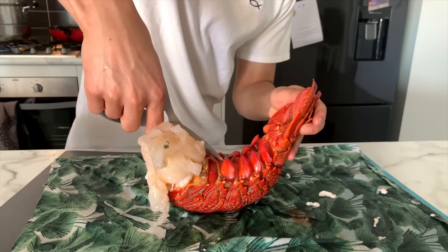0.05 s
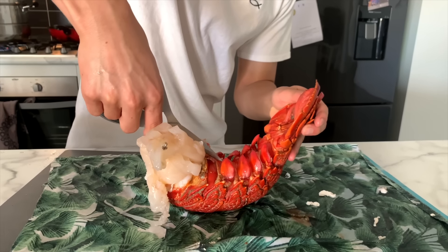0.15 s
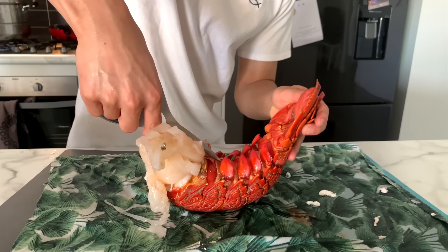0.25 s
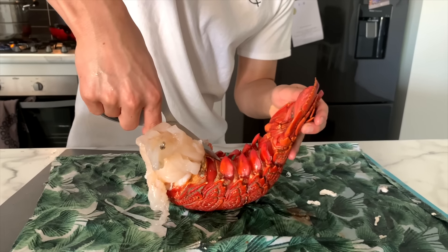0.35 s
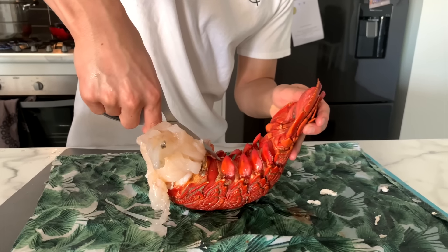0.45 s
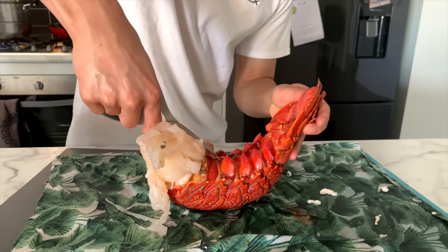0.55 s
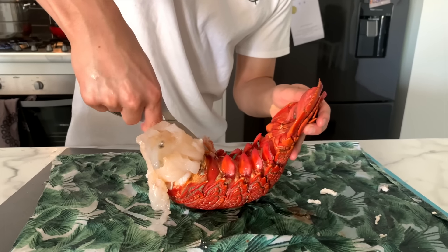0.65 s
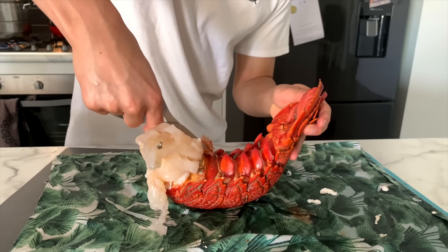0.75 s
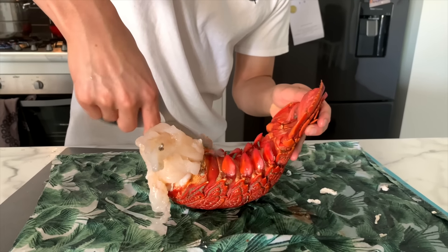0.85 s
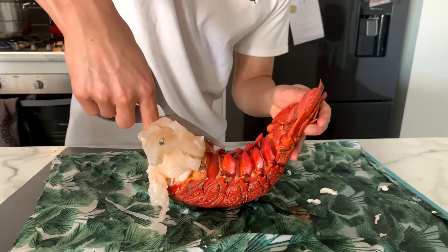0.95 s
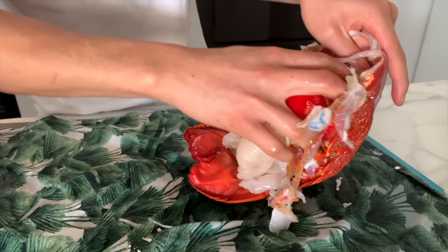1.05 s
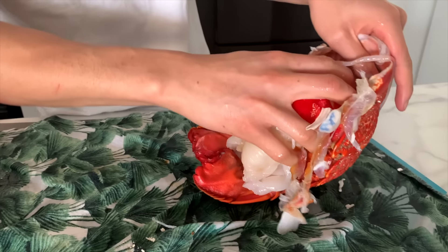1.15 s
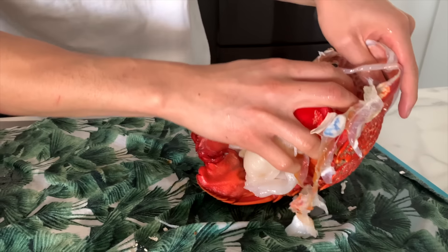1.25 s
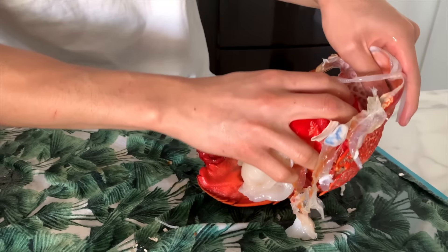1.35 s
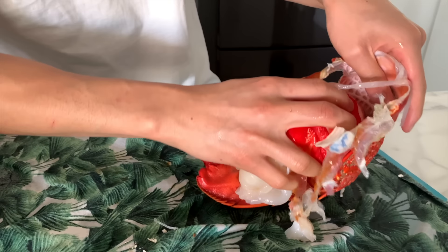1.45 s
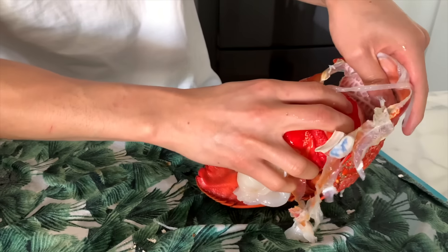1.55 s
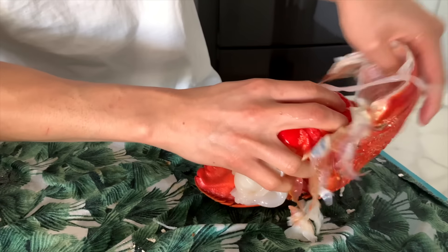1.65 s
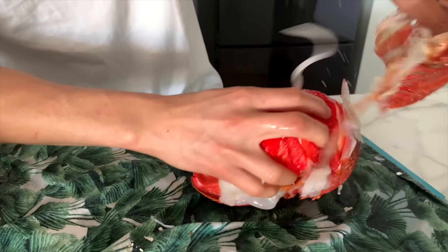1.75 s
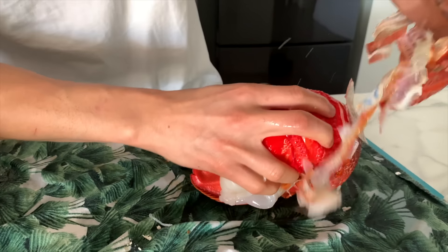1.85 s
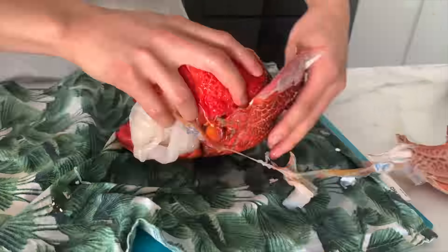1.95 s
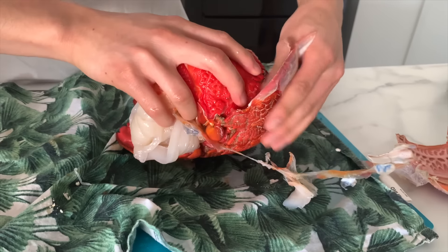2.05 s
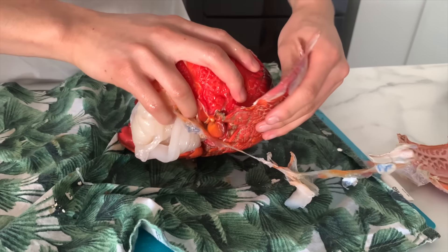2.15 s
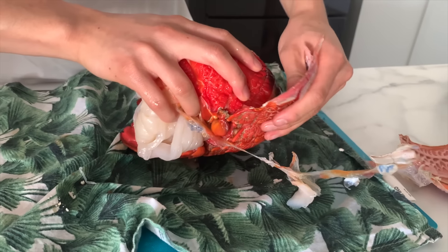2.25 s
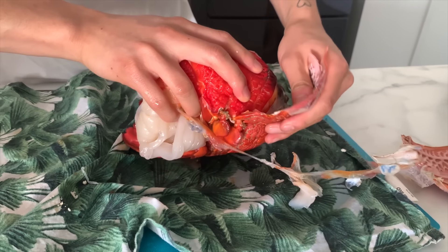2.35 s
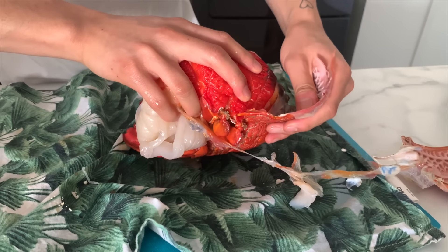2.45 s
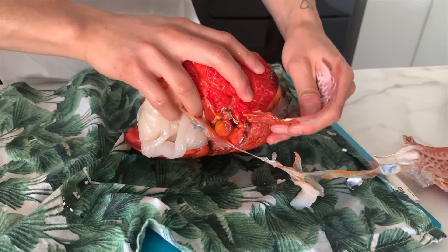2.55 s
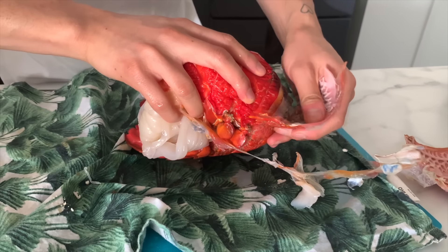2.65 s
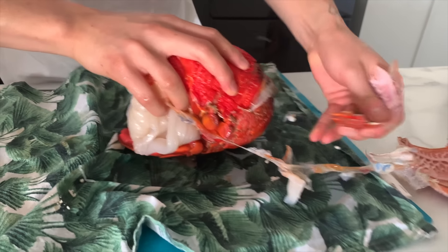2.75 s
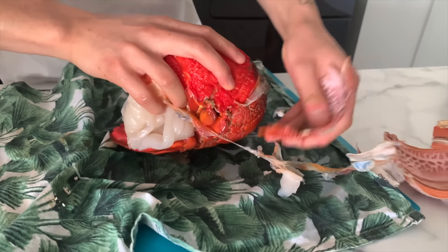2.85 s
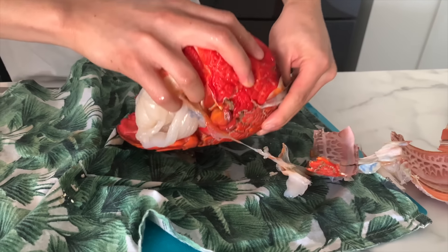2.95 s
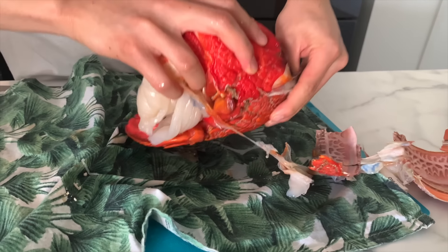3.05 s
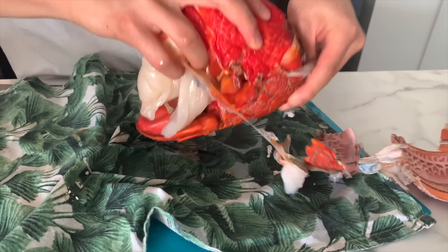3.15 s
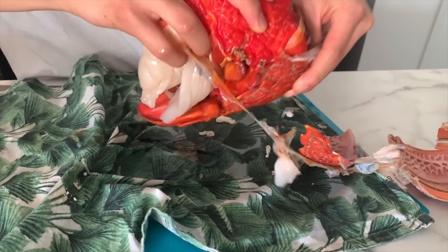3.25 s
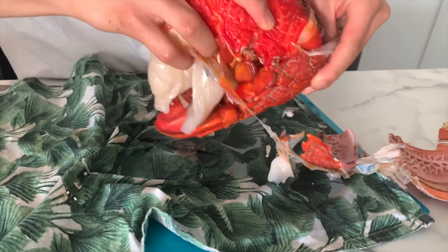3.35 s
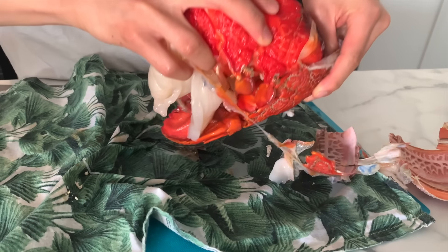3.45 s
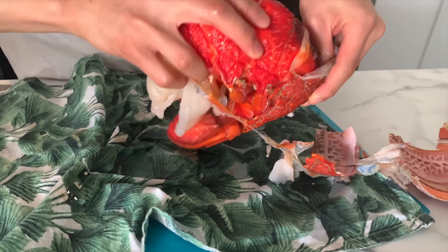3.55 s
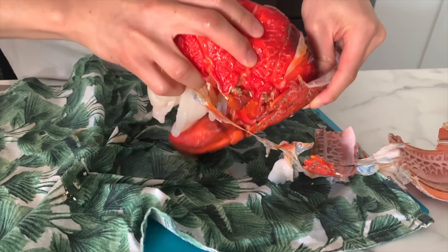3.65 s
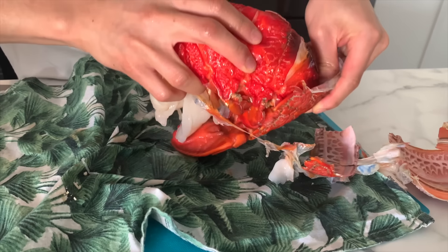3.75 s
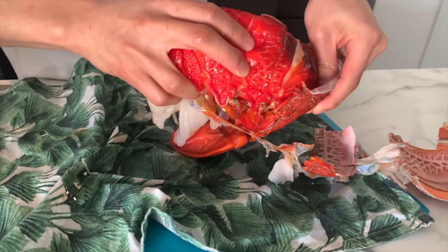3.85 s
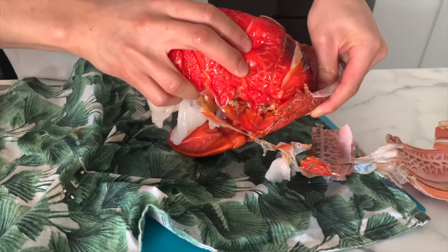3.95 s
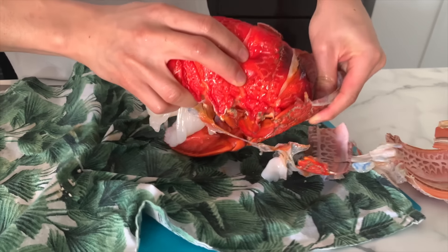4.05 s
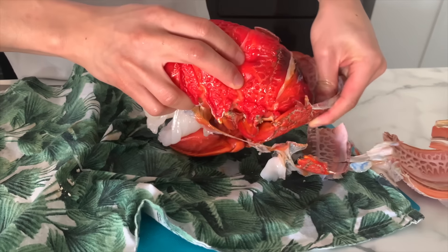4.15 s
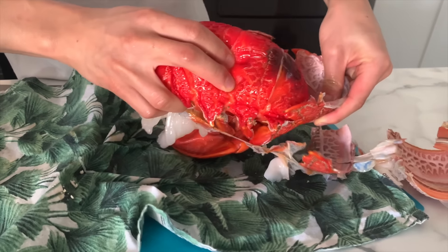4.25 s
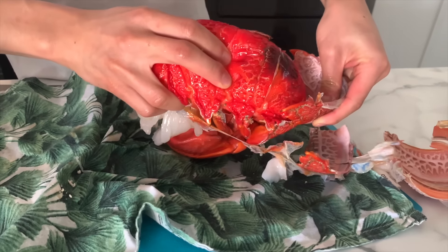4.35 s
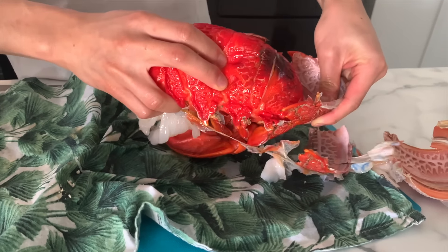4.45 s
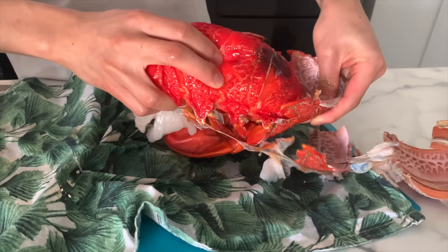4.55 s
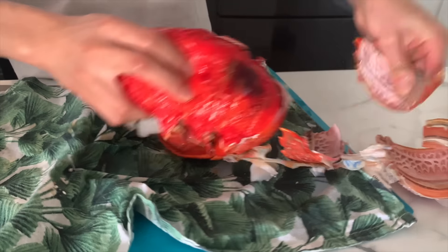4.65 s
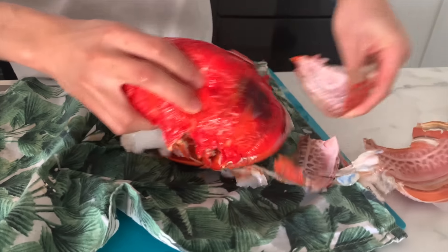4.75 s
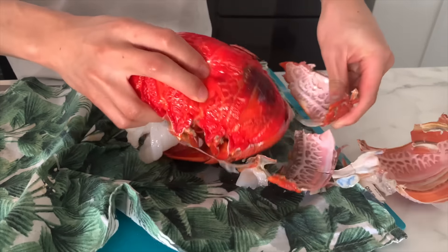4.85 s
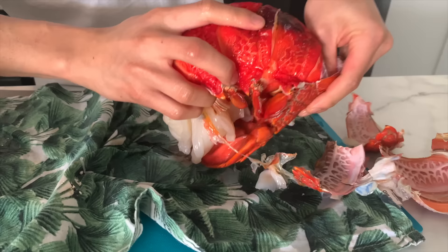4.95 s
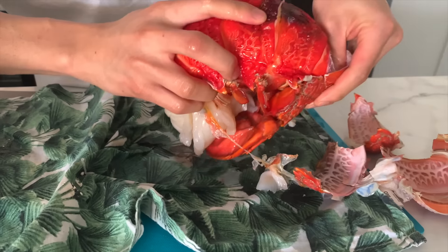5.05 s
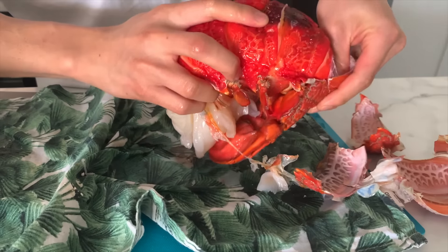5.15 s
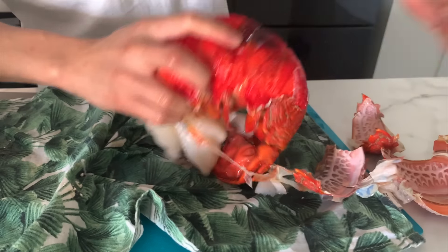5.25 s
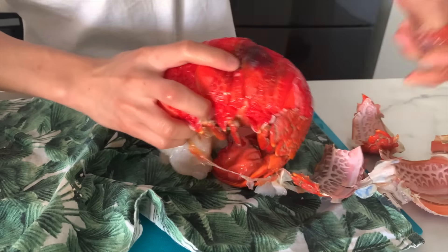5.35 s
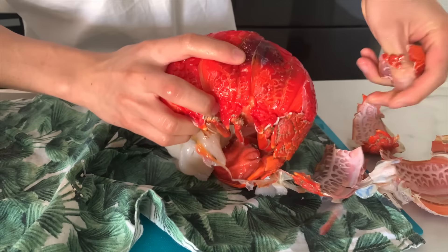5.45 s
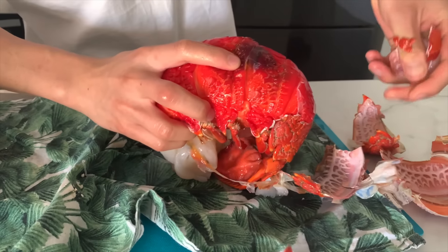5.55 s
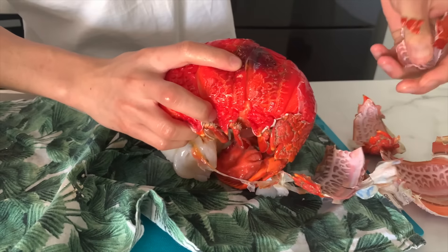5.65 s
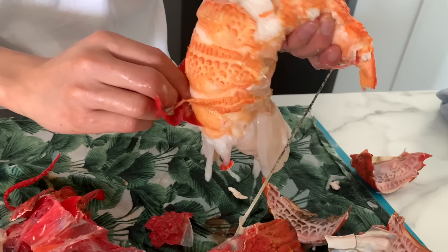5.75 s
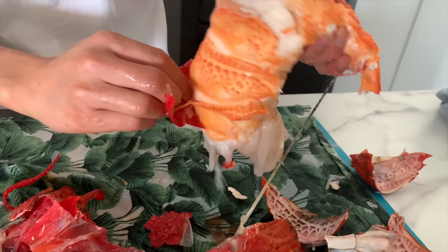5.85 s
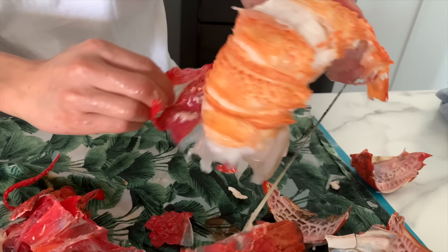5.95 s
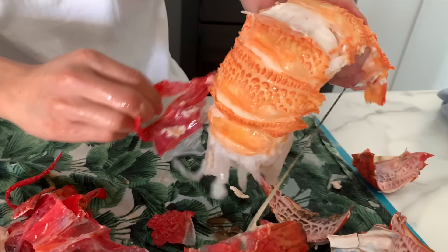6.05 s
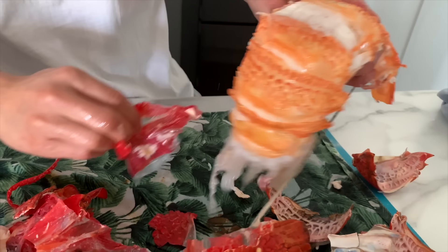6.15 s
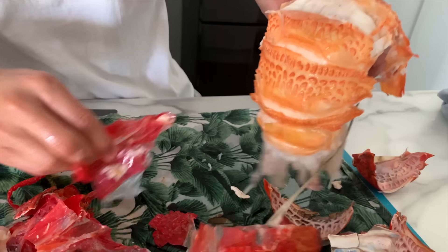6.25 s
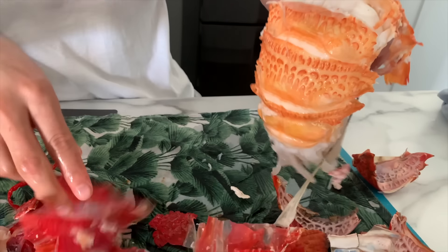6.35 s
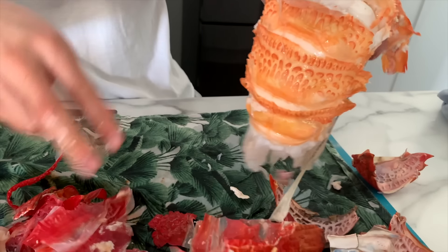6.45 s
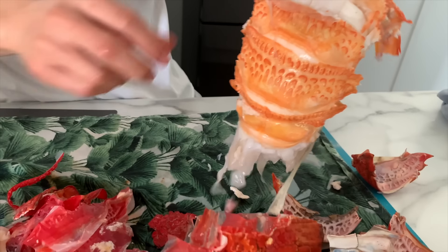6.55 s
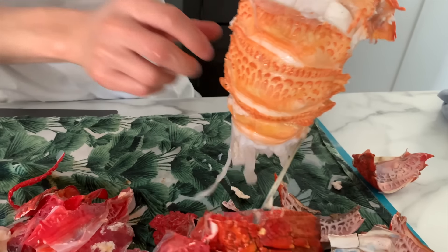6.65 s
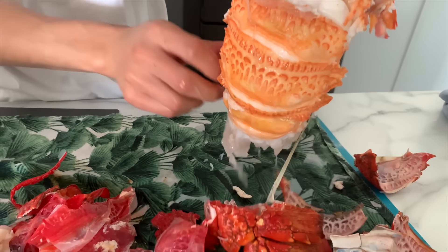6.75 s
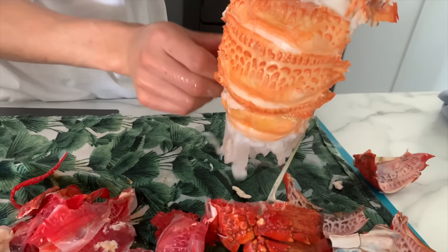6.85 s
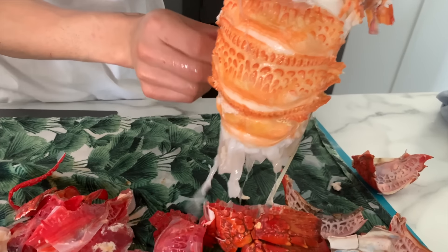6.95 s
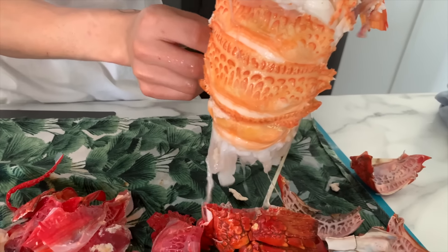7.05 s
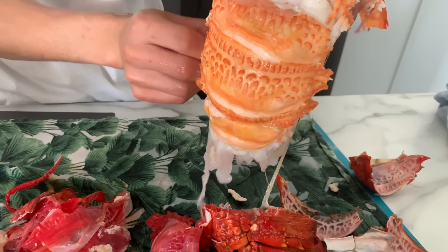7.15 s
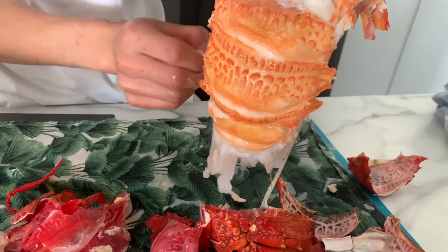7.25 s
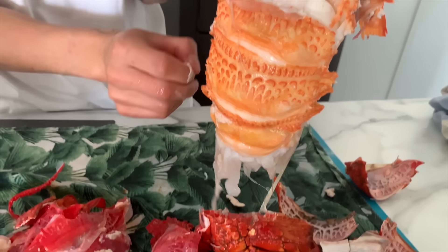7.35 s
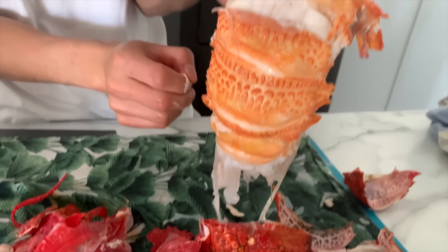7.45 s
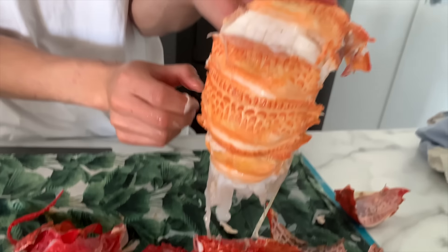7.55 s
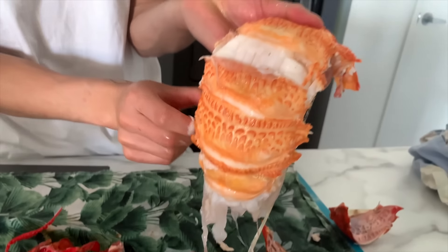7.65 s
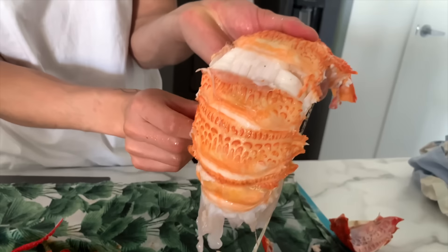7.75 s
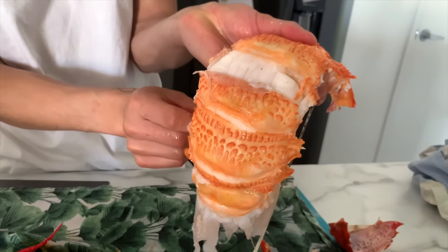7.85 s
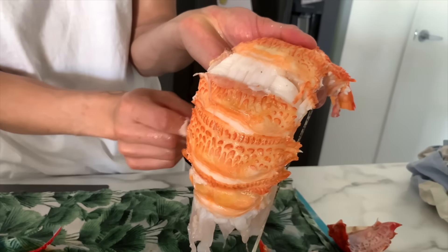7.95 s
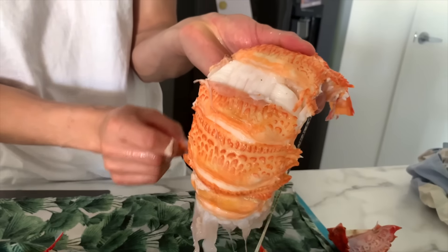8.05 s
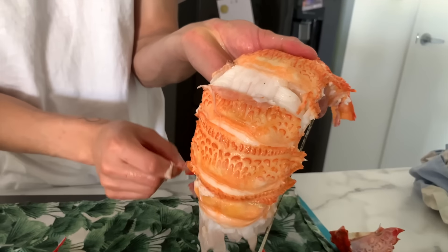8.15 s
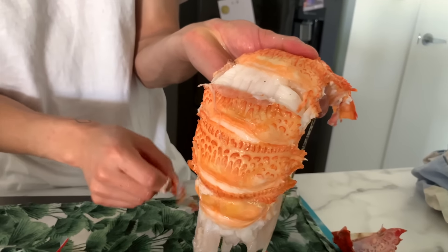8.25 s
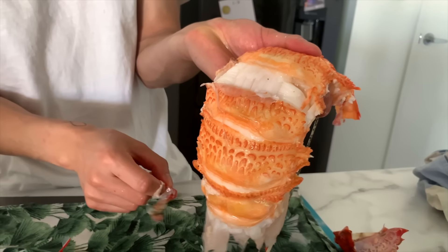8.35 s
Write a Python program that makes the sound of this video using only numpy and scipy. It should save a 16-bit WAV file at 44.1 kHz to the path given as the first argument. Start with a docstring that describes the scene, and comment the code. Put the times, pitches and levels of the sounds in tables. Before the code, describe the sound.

Hands break a lobster shell close up: loud, brittle snaps in uneven bursts, then faint peeling and small pieces dropping over a kitchen hum.

```python
"""A lobster's shell is broken by hand over a cloth-covered board, in a humming, hard-walled kitchen.
First come faint ticks and the crackle of shell peeling from meat. From about 1 s come runs of loud snaps:
each is a tiny burst of noise that makes the freed plate of shell ring. Now and then the tail bumps the board.
Just after 5 s the loudest snaps overload the nearby microphone, and a loose piece lands with a clack.
Soft peeling and a few small falling pieces end the scene."""
import sys
import numpy as np
from scipy import signal
from scipy.fft import rfft, irfft, next_fast_len
from scipy.io import wavfile
from scipy.ndimage import uniform_filter1d, map_coordinates

SR = 44100
rng = np.random.default_rng(int(sys.argv[2]) if len(sys.argv) > 2 else 0)


def store_wav(level_fs):
    """Save 16-bit WAV to argv[1]."""
    pcm = np.round(np.clip(np.atleast_2d(level_fs), -1, 1) * 32767)
    wavfile.write(sys.argv[1], SR, pcm.T.astype(np.int16))


N = 370440
TIME = np.arange(N) / SR


def from_db(db):
    """Turn decibels into a number to multiply by."""
    return 10 ** (np.asarray(db) / 20)


def rms_one(x):
    """Scale a sound so that its average level (rms) is 1."""
    return x / np.sqrt(np.mean(x ** 2) + 1e-20)


def energy_one(x):
    """Scale a sound so that its energy is 1 per channel, on average."""
    return rms_one(x) / np.sqrt(x.shape[-1])


def at_hz(points, hz, column=1):
    """Look up a table at any frequency, sliding smoothly between its rows."""
    points = np.array(points)
    return np.interp(np.log(hz), np.log(points[:, 0]), points[:, column])


def band(x, low_hz, high_hz, order=2):
    """Keep what lies between two frequencies."""
    sections = signal.butter(order, [low_hz, min(high_hz, .47 * SR)], "band", fs=SR, output="sos")
    return signal.sosfilt(sections, x + 1e-18)


def ring(x, hz, fade_s):
    """Make a sound ring at one pitch; the ring falls by 60 dB in fade_s."""
    kept = from_db(-60 / (fade_s * SR))
    return signal.lfilter([1, 0, -1], [1, -2 * kept * np.cos(2 * np.pi * hz / SR), kept * kept], x + 1e-18)


def coloured(x, points, peaks=()):
    """Turn frequencies up or down along a curve, with optional narrow peaks on top."""
    hz = np.fft.rfftfreq(N, 1 / SR) + 1
    peaks_db = sum(lift_db / (1 + ((hz - centre) / width) ** 2) for centre, width, lift_db in peaks)
    return irfft(rfft(x) * from_db(at_hz(points, hz) + peaks_db), N)


def stereo_noise(size, alike):
    """Hiss whose left and right sides are unrelated (alike=0), the same (1) or in between."""
    mid, side = rng.standard_normal((2, size))
    return np.sqrt((1 + alike) / 2) * mid + np.sqrt((1 - alike) / 2) * side * np.array([[1], [-1]])


def add(out, start_s, sound):
    """Mix a sound in at a given time."""
    at = max(round(start_s * SR), 0)
    out[:, at:at + sound.shape[1]] += sound[:, :N - at]


def room_hum(level_db=-55):
    """A steady low rumble and the soft rush of a kitchen appliance."""
    # tone of the hum: frequency_hz, level_db
    colour = [(25, -15), (60, 7.5), (130, 0.5), (260, -6.5), (430, -16), (700, -10.5), (1600, -15),
              (2300, -14), (3600, -25), (7000, -31), (12000, -28.5), (16000, -34)]
    # where the appliance's rush rings: pitch_hz, width_hz, lift_db
    peaks = [(1109, 180, 13.5), (7796, 450, 17)]
    # how alike left and right are: frequency_hz, likeness (0 to 1)
    likeness = [(60, 1), (300, 0.62), (1100, 0.15), (3000, 0.24), (8000, 0.28), (15000, .8)]
    alike = at_hz(likeness, np.fft.rfftfreq(N, 1 / SR) + 1)
    mid, side = rfft(rng.standard_normal((2, N)))
    noise = irfft(np.sqrt(1 + alike) * mid + np.sqrt(1 - alike) * side * np.array([[1], [-1]]), N)
    return from_db(level_db) * rms_one(coloured(noise, colour, peaks))


def shifting_echoes(x, echo, memory_s=.006, stretches=10):
    """Moving hands change the echo paths: each stretch of sound gets a reshuffled copy of the echo."""
    size, out = N // stretches, np.zeros((2, N))
    paths = signal.hilbert(echo, next_fast_len(echo.shape[1]))
    step = 100  # samples between random nudges of the phase
    for at in range(0, N, size):
        nudges = rng.standard_normal(paths.shape[1] // step + 2) * np.sqrt(step / (memory_s * SR))
        phase = np.interp(np.arange(paths.shape[1]) / step, np.arange(len(nudges)), np.cumsum(nudges))
        reshuffled = (paths * np.exp(1j * phase)).real
        add(out, at / SR, signal.fftconvolve(x[:, at:at + size], reshuffled, axes=1))
    return out


def kitchen_echo(x, early_db=-7.5, early_s=0.011, build_s=0.0022):
    """The worktop and the cook's body bounce the sound back at once; the walls add a long wash."""
    # echo of the walls: frequency_hz, level_db, fade_s
    walls = [(150, -13, 0.82), (400, -10, 0.93), (993.6, -5, 0.81), (2005, -7, 1.035), (4000, -6, 0.75),
             (6580, -11, 0.82), (10500, -12.5, 0.45), (13500, -20, 0.51), (15940, -23.5, 0.37)]
    t = np.arange(int(1.3 * SR)) / SR
    early = band(stereo_noise(len(t), 0.64), 250, 6700, order=1) * np.exp(-t / early_s) * (t > .0012)
    late, edges_hz = 0, np.geomspace(25, 17000, 25)
    for low, high in zip(edges_hz, edges_hz[1:]):
        hz = np.sqrt(low * high)
        fade = energy_one(from_db(-60 * t / at_hz(walls, hz, column=2)) * (1 - np.exp(-t / build_s)))
        noise = stereo_noise(len(t), alike=1 / (1 + (hz / 450) ** 2))
        late = late + band(noise, low, high) * fade * from_db(at_hz(walls, hz))
    return shifting_echoes(x, from_db(early_db) * energy_one(early) + late)


def tail_bumps(scuff_db=-8):
    """Soft, rubbing bumps make the tail and board ring low, with a dull scuff of the cloth."""
    # the tail meeting the board: start_s, level_db, pitch_hz, contact_s
    bumps = [(0.6, -50.5, 120, 0.011), (1.173, -42, 238, 0.055), (1.589, -36.5, 294, 0.03),
             (1.99, -51.5, 376, 0.05), (2.022, -44.5, 348, 0.016), (2.538, -58.5, 136, 0.084),
             (2.611, -47, 125, 0.04), (2.78, -47.5, 298, 0.038), (2.817, -39, 275.7, 0.0078),
             (5.845, -51, 270, 0.021), (5.89, -48, 367, 0.018), (5.94, -49.5, 124, 0.034)]
    # tones of one bump: pitch_ratio, level_db, fade_s
    tones = [(1.001, 10, 0.044), (1.4, -3.5, 0.046), (1.803, -9.5, 0.048), (2.451, -8.5, 0.036),
             (3.301, -9, 0.045), (4.8, -16, .02)]
    out, t = np.zeros((2, N)), np.arange(SR // 3) / SR
    for start_s, level_db, pitch_hz, contact_s in bumps:
        push = stereo_noise(len(t), 0.6) * t * np.exp(-2 * t / contact_s)
        body = sum(from_db(db) * energy_one(ring(push, pitch_hz * ratio, fade_s))
                   for ratio, db, fade_s in tones)
        scuff = from_db(scuff_db) * energy_one(band(push, 190, 1100, order=4))
        add(out, start_s, from_db(level_db) * (energy_one(body) + scuff) * np.sqrt(SR * 0.045))
    return out


def falling_pieces(contact_s=0.00079):
    """Loose pieces of shell land with a dull, hollow clack."""
    # pieces landing: start_s, level_db, brightness_hz
    landings = [(4.891, -42, 1190), (5.4286, -11.5, 2206), (6.5261, -30.5, 1390), (6.63, -49.5, 1200),
                (8.271, -59, 3030)]
    # tones of a loose piece: pitch_hz, level_db, fade_s
    tones = [(908, -33.5, 0.0043), (1428, 8.5, 0.0057), (1990, 5.5, 0.005), (3060, -3.5, 0.016),
             (4130, -2, 0.014)]
    out, t = np.zeros((2, N)), np.arange(SR // 10) / SR
    for start_s, level_db, brightness_hz in landings:
        tap = stereo_noise(len(t), 1.0) * t * np.exp(-2 * t / contact_s)
        clack = sum(from_db(db) * energy_one(ring(tap, hz, fade_s)) for hz, db, fade_s in tones)
        dulled = energy_one(band(clack, 760, 1.5 * brightness_hz, order=3))
        add(out, start_s, from_db(level_db) * dulled * np.sqrt(SR / 250))
    return out


def pull(clicks, peak_s, level_db, length_s, pitch_hz, build_share=0.46, swing_db=23, plate_db=-9.0):
    """One pull swells and dies away, its crackle tinted by the bending plate. Gives (start_s, sound)."""
    first = max(round((peak_s - 3 * build_share * length_s) * SR), 0)
    last = round((peak_s + 3 * (1 - build_share) * length_s) * SR)
    from_peak = (TIME[first:last] - peak_s) / length_s
    below_peak_db = swing_db * np.maximum(-from_peak / build_share, from_peak / (1 - build_share))
    crackle = clicks[:, first:last]
    plate = from_db(plate_db) * rms_one(band(crackle, pitch_hz / 1.25, pitch_hz * 1.25))
    return TIME[first], from_db(level_db - below_peak_db) * (crackle + plate)


def peeling(clicks_per_s=1600, spread_db=5.0, click_s=0.0017):
    """Fibres let go one by one as shell peels from meat: tiny clicks of very uneven size."""
    # pulls on the shell: peak_s, level_db, length_s, pitch_hz
    pulls = [(-0.01, -51, 0.67, 2000), (0.285, -44, 0.34, 4320), (.597, -23.5, 0.044, 4795),
             (0.797, -36, 0.11, 3900), (1.614, -18, 0.065, 3830), (2.701, -33, 0.21, 2050),
             (3.023, -40, 0.13, 5600), (4.542, -12.5, 0.042, 5600), (5.124, -25, 0.014, 5500),
             (5.16, -28, .05, 5500), (5.369, -40, 0.17, 3980), (5.846, -43.5, 0.097, 2420),
             (5.97, -46.5, 0.16, 7260), (6.325, -53.5, .1, 6500), (6.599, -61, 0.3, 5000),
             (6.857, -64, 0.26, 5360), (7.299, -68, 0.32, 4500), (7.965, -50, .07, 1800)]
    # tone of the crackle: frequency_hz, level_db
    colour = [(200, -17), (600, -4.5), (1500, 0.5), (4000, 5.5), (7000, 1), (11000, -1), (16000, -12.5)]
    sizes = from_db(spread_db * np.minimum(rng.exponential(1, N), 4))
    spikes = sizes * (rng.random(N) < clicks_per_s / SR)
    fades = signal.lfilter([1], [1, -np.exp(-1 / (click_s * SR))], spikes + 1e-18)
    clicks = rms_one(coloured(fades * stereo_noise(N, 0.29), colour))
    out = np.zeros((2, N))
    for row in pulls:
        add(out, *pull(clicks, *row))
    return out


def straining(length_s=0.013, swell_s=0.0016, level_db=-12.0):
    """Tiny cracks gather in the bent shell just before it gives way."""
    t = np.arange(round(length_s * SR)) / SR
    clicks = stereo_noise(len(t), 0.74) * (rng.random(len(t)) < .05)
    return from_db(level_db) * rms_one(band(clicks, 2200, 10000)) * np.exp((t - length_s) / swell_s)


def break_burst(t, rise_s, decay_s):
    """The noise of a break, which swells and dies within a few milliseconds."""
    return stereo_noise(len(t), 0.82) * (1 - np.exp(-(t / rise_s) ** 2)) * np.exp(-t / decay_s)


def snap(pitch_hz, splinter_db, thud_db, rise_s=.00035, run_s=0.0011, splinter_s=0.0016):
    """A crack runs through the shell in about a millisecond. Gives (ringing plate, breaking noise)."""
    # tones of the freed plate: pitch_ratio, level_db, fade_cycles
    tones = [(.76, -6.5, 11), (1, -1, 13), (1.42, -14.5, 9.1)]
    t = np.arange(SR // 25) / SR
    burst = break_burst(t, rise_s, run_s)
    # the freed plate springs back and rings for a few cycles
    spring = energy_one(np.exp(-((t - 2 * rise_s) * 4 * pitch_hz) ** 2)) * rng.choice([-1, 1])
    kick = spring + .5 * energy_one(burst)
    plate = 0
    for k, (ratio, db, cycles) in enumerate(tones):
        hz = pitch_hz * ratio
        plate = plate + (-1) ** k * from_db(db) * energy_one(ring(kick, hz, cycles / hz))
    # the shell around it rattles, a little more on the left; splinters go on parting a little longer
    rattle = energy_one(band(break_burst(t, rise_s, run_s), 1500, 6500, order=3))
    shell = from_db([[-5.24], [-6.76]]) * rattle
    splinters = from_db(splinter_db) * energy_one(band(break_burst(t, rise_s, splinter_s), 5500, 14300))
    thud = from_db(thud_db) * energy_one(band(burst, 45, 800))
    return np.array([plate, shell + splinters + thud]) * np.sqrt(SR / 250)  # energy of 4 ms at rms 1


def breaking_shell(full_thud_db=-26, thud_follows=0.77):
    """The shell gives way in runs of snaps. Gives (ringing plates, breaking noise)."""
    # cracks in the shell: start_s, level_db, pitch_hz, splinter_db
    cracks = [(0.194, -38.5, 3285, 0.5), (0.2107, -35.5, 3410, -7), (0.3546, -36, 4200, -6),
              (.379, -26.5, 4150, -0.5), (.478, -33, 4300, -1), (0.5891, -33, 4100, 1),
              (.598, -20.5, 4900, 1), (.7837, -37, 4920, 1.5), (0.8072, -26, 3450, -2),
              (1.1886, -7, 1957, 0), (1.2063, -9, 2020, -5), (1.2091, -9.5, 1810, -4),
              (1.2277, -9.5, 1823, -5.5), (1.3573, -12.5, 1660, 3.5), (1.3592, -9.5, 3305, -7.5),
              (1.5478, -19, 2410, -9), (1.5521, -13, 1758, -3.5), (1.567, -20.5, 2048, 1),
              (1.6111, -13, 3780, 6), (1.627, -16, 1820, -3), (1.6346, -15.5, 1460, 2),
              (1.8801, -47, 1593, 0.5), (2.1948, -30, 3230, 2.5), (2.2096, -25.5, 3340, -9),
              (2.2237, -10, 3250, 3), (2.236, -13, 4180, -3.5), (2.266, -25, 5300, 1.5),
              (2.3153, -40.5, 4690, 9.5), (2.331, -31.5, 3300, 3), (2.4814, -40, 3215, 17),
              (2.5712, -36.5, 3044, 14.5), (2.586, -15.5, 3320, 6.5), (2.606, -14.5, 3153, 5),
              (2.9614, -32.5, 4316, -2.5), (3.0358, -7.5, 2300, -6), (3.061, -16, 2330, -7),
              (3.4362, -7.5, 2300, -0.5), (3.5276, -4, 2400, -9.5), (3.5344, -22, 3040, 2),
              (3.5527, -14.5, 3810, 0.5), (3.5758, -31, 4700, 11.5), (3.7062, -28.5, 5000, 6),
              (3.8119, -38.5, 3228, 3), (3.8477, -36.5, 3850, 7), (3.9073, -5, 2600, -2.5),
              (3.916, -19, 3750, -8), (4.117, -30, 2198, -3), (4.1259, -21, 2936, -10.5),
              (4.1368, -12, 3182, 0.5), (4.139, -10, 5088, 0.5), (4.15, -15.5, 3230, -2),
              (4.2042, -12, 3050, -3), (4.5325, -11.5, 5560, 3.5), (4.5365, -11.5, 3416, -4),
              (4.541, -9.5, 3352, 0), (4.5443, -9.5, 5425, -0.5), (4.5607, -14.5, 3190, 3.5),
              (4.571, -10, 3124, 0), (5.1334, -13.5, 3913, 7), (5.1377, -12, 2532, 4),
              (5.1467, 0.5, 3150, 3), (5.148, -7.5, 5390, -3), (5.159, -6, 4850, 5),
              (5.165, -11, 4600, 8.5), (5.1829, -7, 2550, 1.5), (5.1865, -2.5, 3950, -6.5),
              (5.1883, 4, 4050, -13.5), (5.654, -38, 4370, 7), (5.695, -52.5, 5240, 15.5),
              (5.868, -40.5, 2247, 6), (5.895, -35, 4370, 3.5), (5.932, -34.5, 5440, -2),
              (5.9747, -33, 2120, 6), (8.371, -63, 1290, 7)]
    plates, breaking = np.zeros((2, 2, N))
    for start_s, level_db, pitch_hz, splinter_db in cracks:
        # in a weaker snap, the body's thud drops less than the rest
        thud_db = full_thud_db - (1 - thud_follows) * level_db
        strain = from_db(level_db) * straining()
        plate, noise = from_db(level_db) * snap(pitch_hz, splinter_db, thud_db)
        add(breaking, start_s - strain.shape[1] / SR, strain)
        add(breaking, start_s, noise)
        add(plates, start_s, plate)
    return plates, breaking


def microphone(x, shared_above_hz=8660, delay_s=0.0002941):
    """Both sides take their top treble from the right; the left gets it late, which widens the sound."""
    # tone of the microphone: frequency_hz, level_db
    colour = [(3000, 0.5), (7000, 0.5), (10000, 1), (13500, 0.5), (15500, -5.5)]
    hz = np.fft.rfftfreq(N, 1 / SR) + 1
    left, right = rfft(x) * from_db(at_hz(colour, hz))
    share = 1 / (1 + (shared_above_hz / hz) ** 20)
    late_right = right * np.exp(-2j * np.pi * hz * delay_s)
    left = np.sqrt(1 - share) * left + np.sqrt(share) * late_right
    return irfft(np.array([left, right]), N)


def limiter(x, threshold_db=-6.0, recovery_db_per_s=39.0):
    """The volume dips on loud snaps and creeps back, which holds up the room's echo."""
    level_db = 10 * np.log10(uniform_filter1d(np.mean(x ** 2, axis=0), size=176).clip(1e-12))
    recovery_db = recovery_db_per_s * TIME
    dip_db = np.maximum.accumulate(np.maximum(level_db - threshold_db, 0) + recovery_db) - recovery_db
    return x * from_db(-uniform_filter1d(dip_db, size=88))


def scene(right_db=1.0, plate_to_room_db=-7.0, piece_to_room_db=-8.5):
    """The hands work close to the microphone, with the kitchen's echo and hum around them."""
    # the hands are left of centre, so the left side hears them first: time_s, lead_ms
    hands = [(.9, 0.15), (1.1, .005), (1.8, .005), (2.1, 0.059), (5.3, .015), (5.6, .13)]
    plates, breaking = breaking_shell()
    pieces = falling_pieces()
    handling = breaking + tail_bumps() + peeling()
    left, right = (plates + pieces + handling) * from_db([[-right_db], [right_db]])
    lead_s = np.interp(TIME, *np.transpose(hands)) / 1000
    left = map_coordinates(left, [(TIME + lead_s) * SR], order=3)
    # the two faces of a small plate cancel at a distance, so it feeds the room weakly
    echo = kitchen_echo(handling + from_db(plate_to_room_db) * plates + from_db(piece_to_room_db) * pieces)
    return np.array([left, right]) + echo + room_hum()


def record(dry, cutoff_hz=16000):
    """The microphone widens the sound, loud snaps dip and overload it, and the highest treble is cut."""
    x = limiter(microphone(dry))
    overloaded = x / (1 + x ** 6) ** (1 / 6)
    return signal.sosfilt(signal.ellip(10, .2, 70, cutoff_hz, fs=SR, output="sos"), overloaded)


dry = scene()
out = record(dry)
store_wav(out)
```